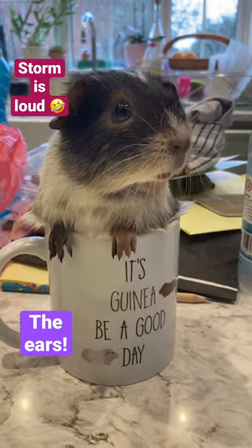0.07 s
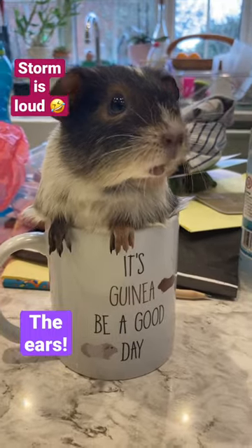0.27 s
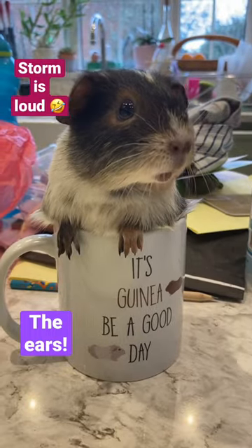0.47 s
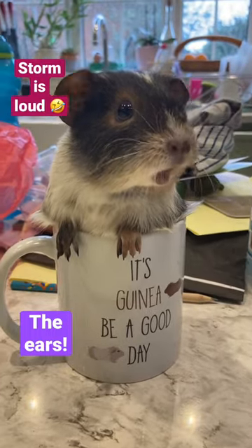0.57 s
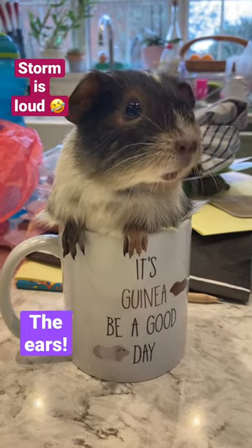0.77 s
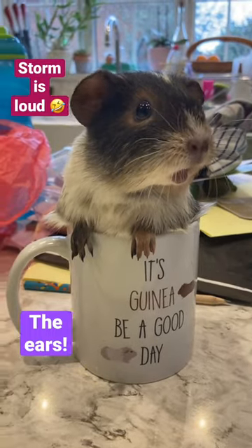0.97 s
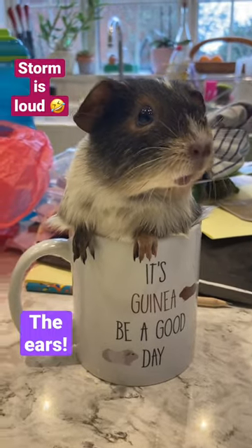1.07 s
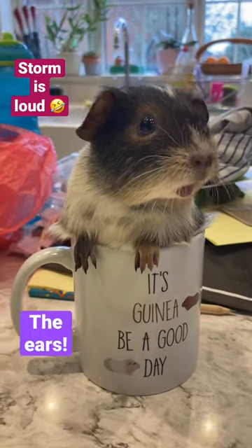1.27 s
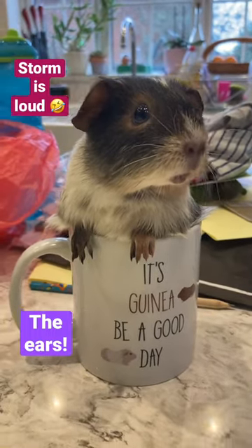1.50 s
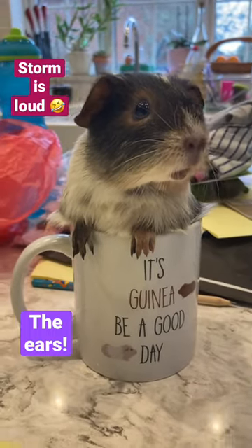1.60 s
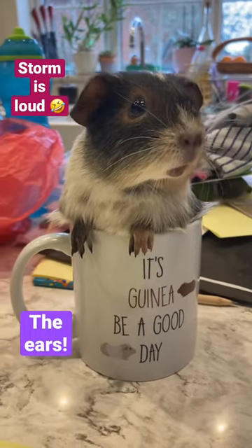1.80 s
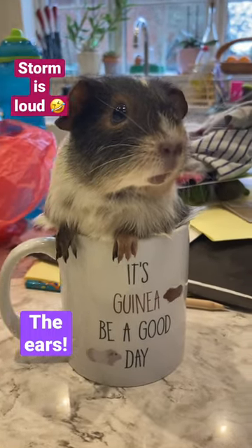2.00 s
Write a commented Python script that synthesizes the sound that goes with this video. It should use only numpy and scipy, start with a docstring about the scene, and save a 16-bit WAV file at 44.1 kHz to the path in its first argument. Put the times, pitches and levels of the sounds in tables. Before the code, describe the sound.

A guinea pig rustles softly, then squeals five times, each call rising from a breathy whine to a shrill pitch. Short squeaks lead into the later calls. It is close to the microphone, with a slight kitchen echo and faint rumble.

```python
"""A guinea pig in a mug on a kitchen counter, close to a phone's stereo microphone, over a low rumble.
It rustles and gives a low breathy whine that breaks into a rising squeal, the harmonics sweeping
through fixed throat resonances. Five such calls come, the first three jumping to a whistle; from the
third on, short squeaks lead in. The last two squeals ring on faintly, and a sixth call only begins.
The kitchen adds a short echo to each call."""
import sys
import numpy as np
from scipy import signal
from scipy.fft import rfft, irfft
from scipy.io import wavfile
from scipy.ndimage import uniform_filter1d

SR = 44100
rng = np.random.default_rng(int(sys.argv[2]) if len(sys.argv) > 2 else 0)


def int16_out(signal):
    """Quantize to a 16-bit WAV file."""
    q = np.round(np.clip(np.atleast_2d(signal).T, -1, 1) * 32767)
    wavfile.write(sys.argv[1], SR, q.astype(np.int16))


N = 90404

# resonances of the nearly closed mouth: frequency_hz, gain_db
MOUTH = [(400, 17), (530, 4), (680, -9.5), (1250, -20), (1500, 0.5), (1700, 8.5), (2050, -13), (2500, 6.5),
         (3100, -22), (4000, -4.5), (5500, -26.5), (7200, -11.5), (9000, -1), (11000, -15), (14500, -26),
         (16000, -17)]
LOW_VOICE_JITTER, LOW_VOICE_EDGE_S = 0.018, 0.02  # whines and squeaks; jitter is a fraction of pitch


def undb(db):
    """Decibels to gain."""
    return 10 ** (np.asarray(db) / 20)


def times():
    """Time of every sample in seconds."""
    return np.arange(N) / SR


def gain_at(hz, curve):
    """Gain read from a curve of frequency_hz, gain_db."""
    curve_hz, db = np.array(curve).T
    return undb(np.interp(np.log(np.maximum(hz, 1)), np.log(curve_hz), db))


def colour(x, curve):
    """Filter a sound by a curve of frequency_hz, gain_db."""
    hz = np.fft.rfftfreq(2 * N, 1 / SR)
    return irfft(rfft(x, 2 * N) * gain_at(hz, curve))[..., :N]


def noise(curve):
    """Coloured noise of rms 1."""
    x = colour(rng.standard_normal(N), curve)
    return x / x.std()


def wander(hz):
    """Smooth random motion of spread 1, up to the given rate."""
    x = signal.sosfilt(signal.butter(4, hz, fs=SR, output="sos"), rng.standard_normal(N))
    return x / x.std()


def gate(start, end, edge_s):
    """On between two times, with soft edges."""
    t = times()
    inside_s = np.minimum(t - start, end - t)
    return np.sin(np.pi / 2 * np.clip(inside_s / edge_s + .5, 0, 1)) ** 2


def swells(rows):
    """Sum of bell-shaped swells: centre_s, half_length_s, level_db."""
    return sum(undb(db) * np.exp(-((times() - at) / length) ** 2) for at, length, db in rows)


def harmonics(hz, weights_db, tilt_db, tract):
    """Harmonics of a moving pitch, tilted per octave and weighted by the resonances they pass through."""
    phase = 2 * np.pi * np.cumsum(hz) / SR
    voice = 0
    for k, db in enumerate(weights_db, 1):
        gain = undb(db + tilt_db * np.log2(k)) * gain_at(k * hz, tract)
        voice += gain * (k * hz < SR / 2) * np.sin(k * phase)
    return np.sqrt(2) * voice


def rumble():
    """Room tone and one soft low bump, as of a hand on the phone, both stronger on the left."""
    # colour of the room tone: frequency_hz, gain_db
    tone_colour = [(20, -35), (45, -6.5), (65, 4), (100, -2), (160, -10), (240, -21.5), (400, -17.5),
                   (700, -27.5), (1500, -27.5), (4000, -60), (9000, -38), (16000, -50)]
    # its rise and fall: time_s, gain_db
    tone_level = [(0, -56.5), (.5, -53), (.66, -68.5), (1.0, -59.5), (1.2, -58.5), (1.5, -53.5),
                  (2.05, -57)]
    # the bump: centre_s, half_length_s, level_db
    bumps = [(.255, 0.039, -35)]
    bump_hz, bump_wobble, left_over_right_db = 54.2, 0.186, 6
    tone = noise(tone_colour) + 1.04 * np.array([noise(tone_colour), noise(tone_colour)])
    tone *= undb(np.interp(times(), *np.array(tone_level).T))
    hz = bump_hz * (1 + bump_wobble * wander(hz=40.4))
    bump = np.sqrt(2) * np.sin(2 * np.pi * np.cumsum(hz) / SR) * swells(bumps)
    return (tone + bump) * undb(np.array([[.5], [-.5]]) * left_over_right_db)


def whines():
    """A breathy low note through the nearly closed mouth holds, then bends up as the voice fades."""
    # whines that open the calls: start_s, end_s, start_pitch_hz, end_pitch_hz, voice_db, hiss_db
    notes = [(.01, 0.092, 467, 510, -54, -82), (0.098, 0.179, 551.4, 627, -50, -84),
             (0.431, 0.499, 536, 630, -45.5, -35), (0.77, 0.869, 514.4, 634, -47.5, -42.5),
             (1.117, 1.22, 515.8, 652, -40.5, -40.5), (1.494, 1.613, 529, 673.5, -42.5, -44.5),
             (1.884, 2.001, 533.7, 696, -44, -46)]
    # colour of the breath: frequency_hz, gain_db
    hiss_colour = [(200, -21), (450, 1.5), (700, -10.5), (1300, -16.5), (1700, 8.5), (2200, -7.5),
                   (2600, -7.5), (3300, -19), (4100, -5), (5600, -19), (7200, -15), (9100, -1), (11000, -9),
                   (13000, -24), (14500, -20), (16000, -22)]
    bend_power, fade_db, hiss_swell_db = 2.1, -19, 0.5
    t, out = times(), np.zeros(N)
    shake = 1 + LOW_VOICE_JITTER * wander(hz=333)
    hiss = noise(hiss_colour)
    for start, end, low_hz, high_hz, voice_db, hiss_db in notes:
        envelope = gate(start, end, LOW_VOICE_EDGE_S)
        on = envelope > 0
        progress = np.clip((t[on] - start) / (end - start), 0, 1)
        bend = progress ** bend_power
        hz = (low_hz + (high_hz - low_hz) * bend) * shake[on]
        voice = harmonics(hz, [voice_db] * 20, tilt_db=-4, tract=MOUTH) * undb(fade_db * bend)
        breath = undb(hiss_db + hiss_swell_db * (progress - 1)) * hiss[on]
        out[on] += envelope[on] * (voice + breath)
    return out


def rustles():
    """Fur and paws brush softly inside the mug."""
    # the animal's movements: centre_s, half_length_s, level_db
    fidgets = [(.03, 0.036, -47.5), (.135, 0.12, -44.5), (.46, 0.016, -42.5)]
    # colour of the rustle: frequency_hz, gain_db
    fur_colour = [(150, -30), (370, 1), (700, -2), (1700, 0.5), (4000, -15), (12000, -38)]
    return swells(fidgets) * noise(fur_colour)


def squeals():
    """Rising squeals: rough and airy on the way up and where the voice cracks, clean on the held note."""
    # one contour per squeal: time_s, pitch_hz, level_db, tilt_db_per_octave
    contours = [
        [(.18, 1696, -23, -14), (.195, 2040, -36.5, -3.5), (.21, 2506, -28, -1.5), (.23, 2970, -22, 2),
         (.245, 3222, -17.5, 0.5), (.249, 3646, -12.5, -0.5), (.28, 3697, -12.5, -1.5), (.315, 3781, -24, 4),
         (.335, 4104, -13.5, -4.5), (.346, 4140, -25.5, -18)],
        [(.49, 1648, -25, -4), (.5, 2025, -20.5, -3), (.516, 2523, -14, 0), (.53, 2815, -12.5, -6.5),
         (.546, 2990, -14.5, -2.5), (.565, 3120, -23.5, 3.5), (.573, 3315, -14, -1), (.578, 3616, -10, -1.5),
         (.6, 3795, -23, 7), (.63, 3875, -23, 2.5), (.655, 3868, -31.5, 6.5), (.673, 3784, -24, 0.5),
         (.686, 3430, -26, -0.5)],
        [(.855, 1506, -37, -1.5), (.875, 2010, -25.5, -1), (.89, 2274, -24, 1.5), (.903, 2654, -17, -0.5),
         (.92, 2898, -15, -8), (.95, 3033, -18, 0), (.972, 3236, -13.5, -3), (.981, 3555, -12, -0.5),
         (.998, 3601, -12, -2), (1.012, 3562, -17, 0.5), (1.028, 3166, -16, -10)],
        [(1.226, 1486, -41, 0.5), (1.25, 2004, -30, 0), (1.272, 2357, -23.5, 1), (1.292, 2828, -17.5, -3.5),
         (1.326, 2961, -21.5, -1), (1.368, 3010, -29.5, 3.5), (1.395, 3044, -14.5, -9.5),
         (1.413, 3047, -25, -20)],
        [(1.635, 1672, -48.5, 4.5), (1.66, 2000, -31.5, 2), (1.68, 2187, -28, 1), (1.7, 2567, -19, -1),
         (1.71, 2794, -21, -3.5), (1.74, 2876, -21.5, -0.5), (1.78, 2999, -24.5, -1.5),
         (1.802, 2873, -30.5, -7)],
    ]
    # resonances of the open throat and mouth: frequency_hz, gain_db
    throat = [(1500, -5.5), (2000, -11.5), (2500, -9), (2900, -1), (3200, -10.5), (3650, -12),
              (3900, -12.5), (4500, -15), (5400, -19), (6000, -13), (6700, -9), (7400, 0), (7800, 2.5),
              (8400, -8), (9400, 6), (10400, -8), (11500, 2), (12300, -17.5), (13300, -11), (14700, -10),
              (16000, -19)]
    # harmonics of the vocal folds, from the fundamental up: level_db
    folds_db = [0, 0.5, -3.5, -3.5, -4.5, -5.5, -22, -5]
    # cracks in the voice: centre_s, half_length_s, roughness (0-1)
    cracks = [(0.206, 0.0064, 0.9), (0.577, .003, 0.2), (0.332, 0.0084, 0.26), (0.512, 0.0043, 0.7),
              (0.673, 0.0037, 0.1), (0.907, 0.0052, 0.52), (1.272, 0.0058, 0.15)]
    whistle_hz = 2440  # the voice is rougher below this pitch
    held_jitter, glide_jitter, rasp_jitter = 0.00091, 0.017, 0.063  # fractions of pitch
    held_air_db, glide_air_db, rasp_air_db = -55, -17.5, -26
    t, out = times(), np.zeros(N)
    rasp = sum(roughness * np.exp(-((t - at) / length) ** 2) for at, length, roughness in cracks)
    shake = wander(hz=492)
    air = noise([(500, -16)] + throat)
    for contour in contours:
        time_s, *columns = np.array(contour).T
        hz, db, tilt = (uniform_filter1d(np.interp(t, time_s, column), size=90) for column in columns)
        strain = 1 / (1 + (hz / whistle_hz) ** 20)
        jitter = held_jitter + glide_jitter * strain + rasp_jitter * rasp
        rough_hz = hz * (1 + jitter * shake)
        breath = air * (undb(held_air_db) + undb(glide_air_db) * strain + undb(rasp_air_db) * rasp)
        envelope = undb(db) * gate(time_s[0], time_s[-1], edge_s=0.0035)
        on = envelope > 0
        out[on] += envelope[on] * (harmonics(rough_hz[on], folds_db, tilt[on], throat) + breath[on])
    return out


def squeaks():
    """Quick low upward glides whose harmonics chirp through the mouth's resonances."""
    # lead-ins to the later calls: start_s, end_s, start_pitch_hz, end_pitch_hz, level_db,
    # tilt_db_per_octave
    glides = [(0.828, 0.851, 788, 1214, -38, -3.5), (1.185, 1.21, 797, 1033, -37, -6),
              (1.224, 1.244, 782, 919, -46.5, 2.5), (1.571, 1.607, 771, 955, -40, -7.5),
              (1.613, 1.646, 745, 878, -45, 2), (1.953, 1.974, 762, 938, -36.5, -6.5),
              (1.99, 2.032, 605, 727, -48, 0.5), (2.02, 2.037, 761, 887, -43.5, 2.5),
              (2.039, 2.054, 1143, 1400, -38, 2.5)]
    t, out = times(), np.zeros(N)
    shake = 1 + LOW_VOICE_JITTER * wander(hz=336)
    for start, end, low_hz, high_hz, db, tilt_db in glides:
        envelope = gate(start, end, LOW_VOICE_EDGE_S)
        on = envelope > 0
        hz = np.interp(t[on], [start, end], [low_hz, high_hz]) * shake[on]
        out[on] += envelope[on] * harmonics(hz, [db] * 20, tilt_db, MOUTH)
    return out


def rings():
    """After each of the last two squeals, its pitch swells once more as a faint pure tone."""
    # ringing tones: centre_s, half_length_s, pitch_hz, level_db
    tones = [(1.532, 0.017, 2996, -39.5), (1.942, 0.026, 2940, -37)]
    return sum(swells([(at, length, db)]) * np.sin(2 * np.pi * hz * times())
               for at, length, hz, db in tones)


def kitchen(x):
    """Direct sound and worktop reflection reach the two microphone ports; the room adds a short tail."""
    # phase of the left port ahead of the right: frequency_hz, lead_rad
    port_phase = [(100, 0.5), (500, -2.15), (1600, -2.02), (2900, 1.66), (3700, 1.5), (7500, 5.5),
                  (15200, 13.5)]
    # the kitchen's echo against the direct sound: frequency_hz, gain_db
    echo_colour = [(500, -10.5), (2000, -15), (3000, -6), (3800, -13), (7500, -14), (9500, -13.5),
                   (11500, -28)]
    worktop_delay_s, worktop_db = 0.00091, -22
    room_delay_s, treble_from_hz = 0.0012, 5000
    t, hz = times(), np.fft.rfftfreq(2 * N, 1 / SR)

    def decay(t60_s):
        """Envelope of the tail, with energy near 1."""
        return undb(-60 * t / t60_s) * (t > room_delay_s) * np.sqrt(2 * np.log(1000) / (t60_s * SR))

    reflection = undb(worktop_db) * np.exp(-2j * np.pi * hz * worktop_delay_s)
    near_spectrum = rfft(x, 2 * N) * (1 + reflection)
    lead = np.interp(hz, *np.array(port_phase).T)
    near = irfft(near_spectrum * np.exp(.5j * np.array([lead, -lead])))[:, :N]
    scatter = rng.standard_normal((2, N))
    low = signal.sosfiltfilt(signal.butter(4, treble_from_hz, fs=SR, output="sos"), scatter)
    treble = scatter - low
    tail = colour(low * decay(t60_s=0.38) + treble * decay(t60_s=0.29), echo_colour)
    return near + signal.fftconvolve(x[None], tail, axes=1)[:, :N]


def scene():
    """The guinea pig at close range, with the kitchen around it."""
    return kitchen(squeals() + whines() + squeaks() + rustles()) + rings() + rumble()


def record(dry):
    """The phone cuts the highest treble steeply."""
    top_hz = 15900
    return signal.sosfilt(signal.ellip(10, .2, 80, top_hz, fs=SR, output="sos"), dry)


dry = scene()
out = record(dry)
int16_out(out)
```